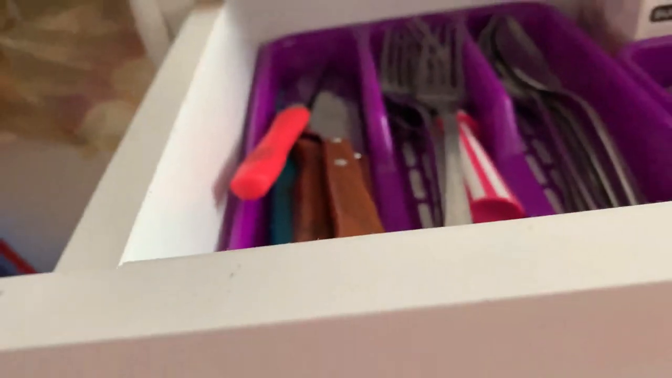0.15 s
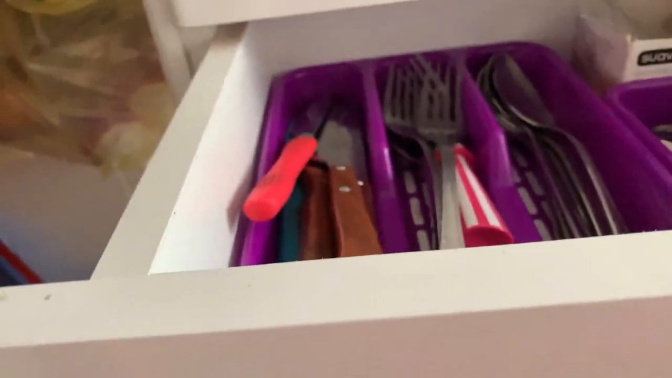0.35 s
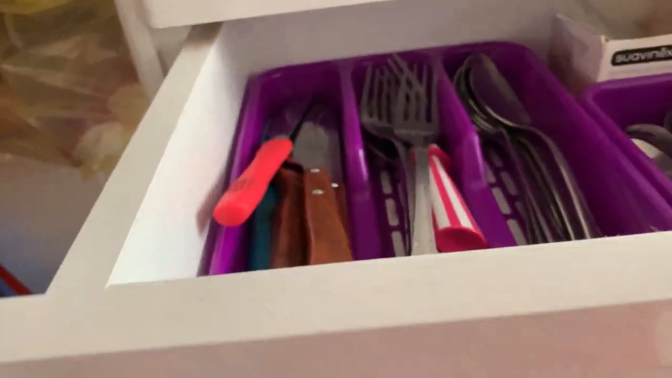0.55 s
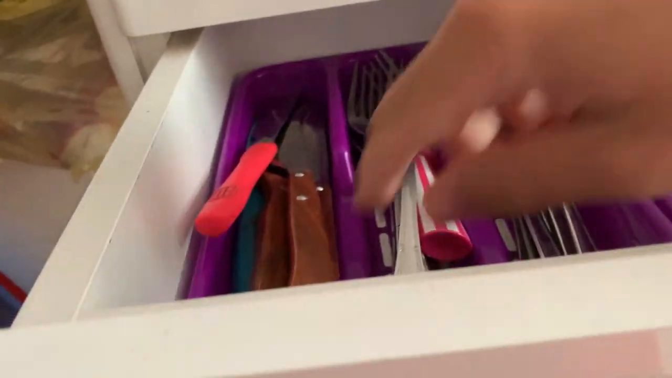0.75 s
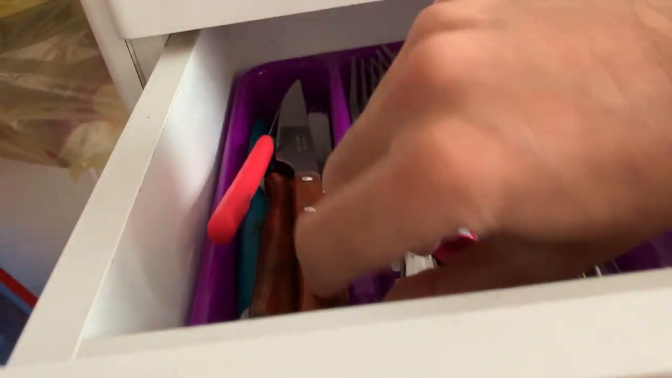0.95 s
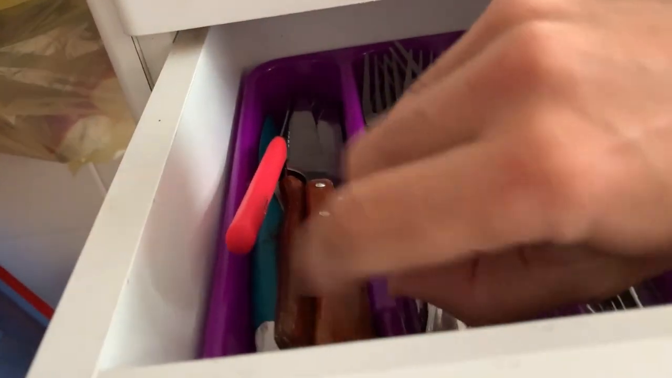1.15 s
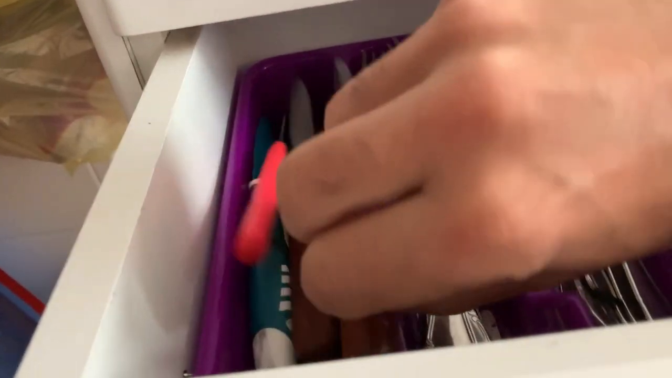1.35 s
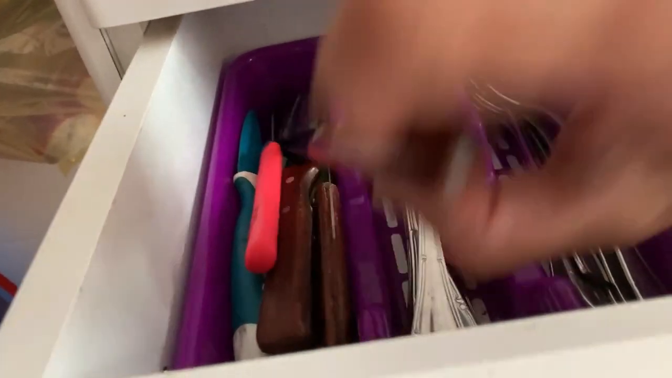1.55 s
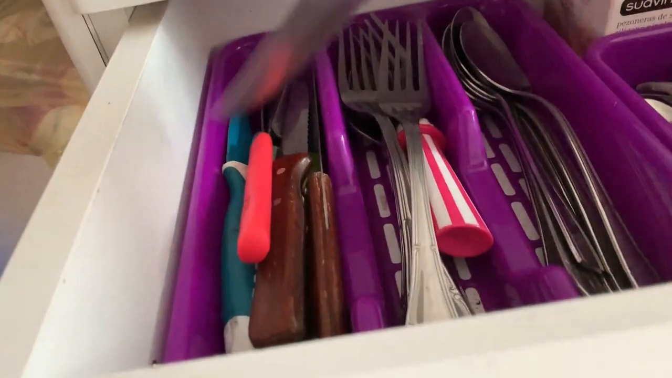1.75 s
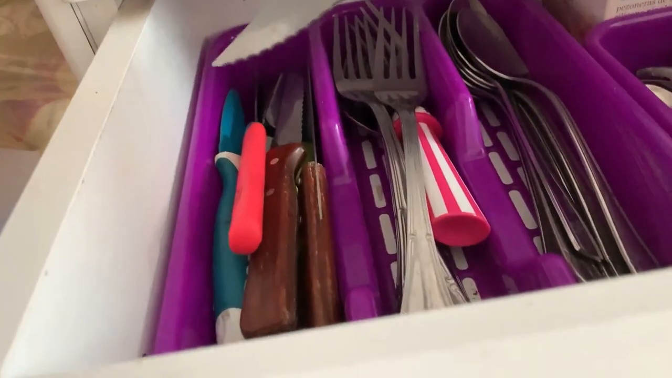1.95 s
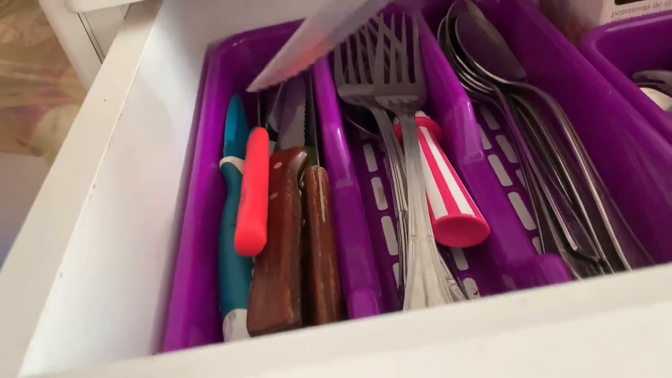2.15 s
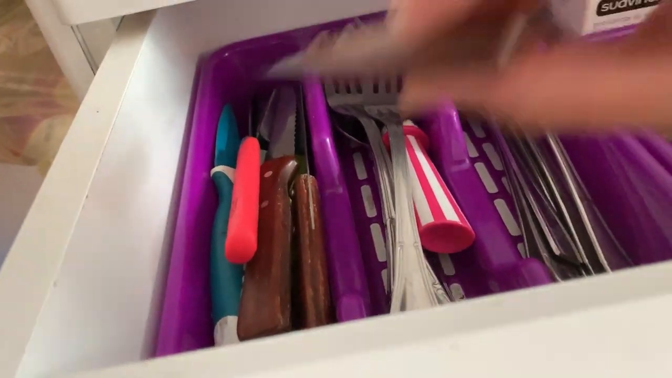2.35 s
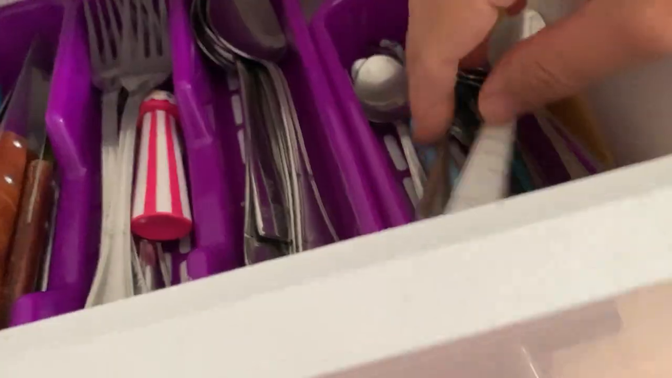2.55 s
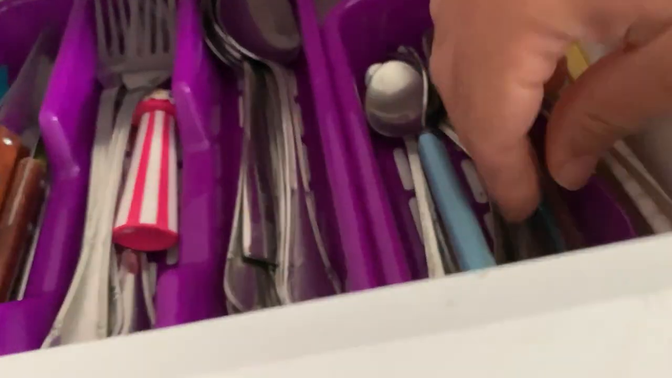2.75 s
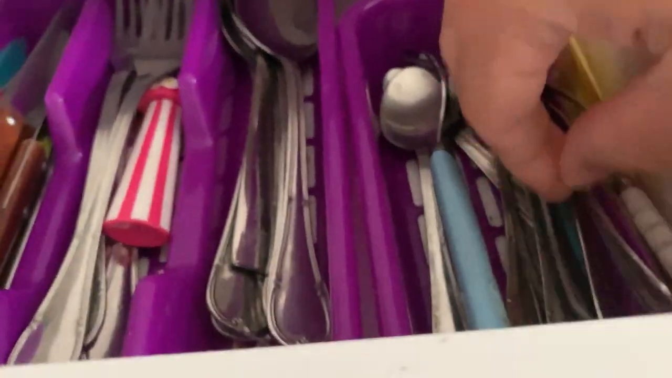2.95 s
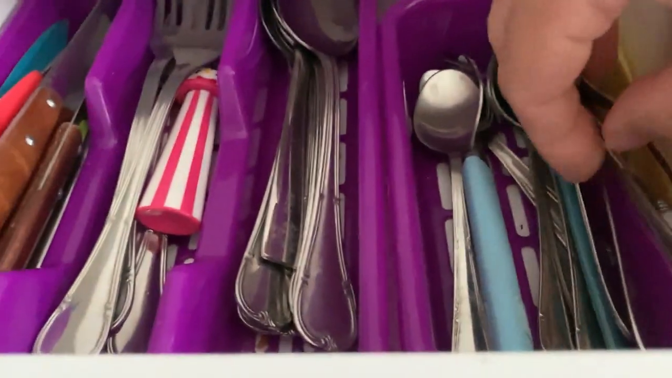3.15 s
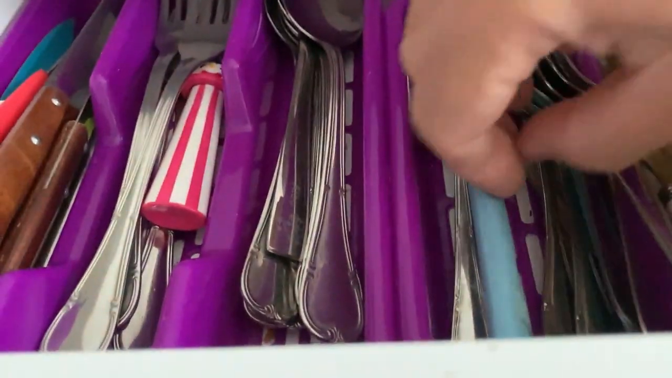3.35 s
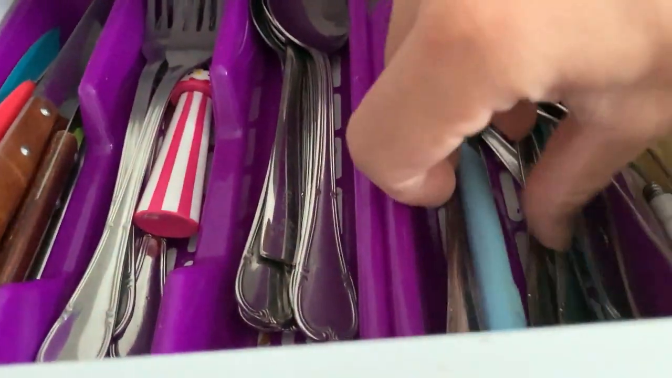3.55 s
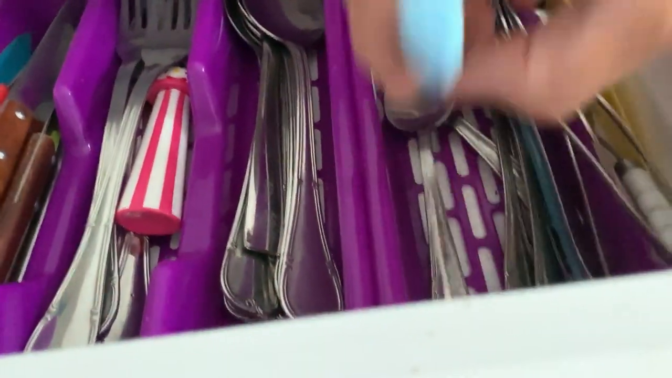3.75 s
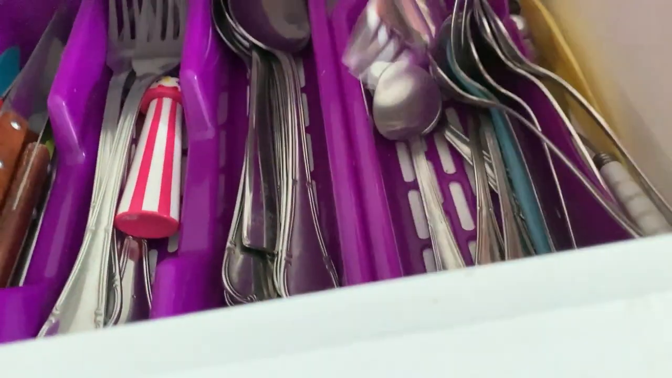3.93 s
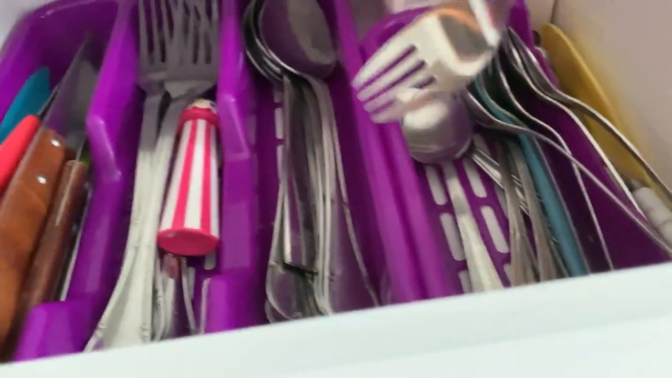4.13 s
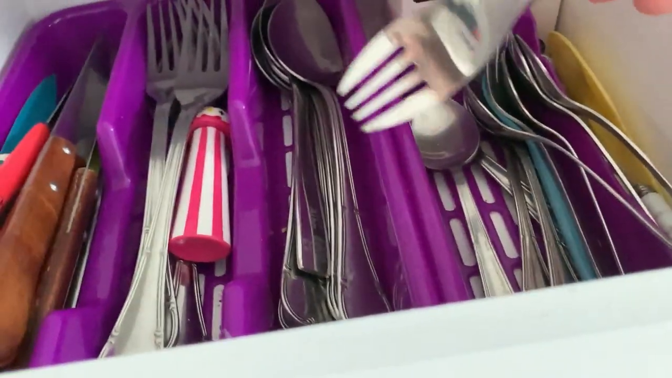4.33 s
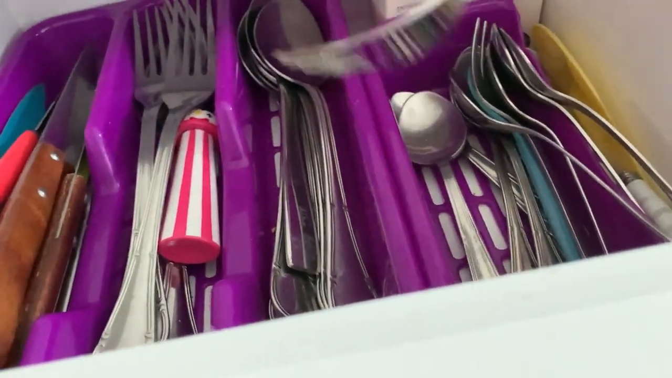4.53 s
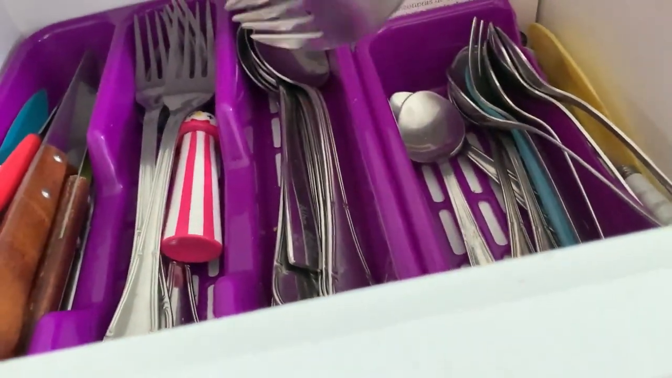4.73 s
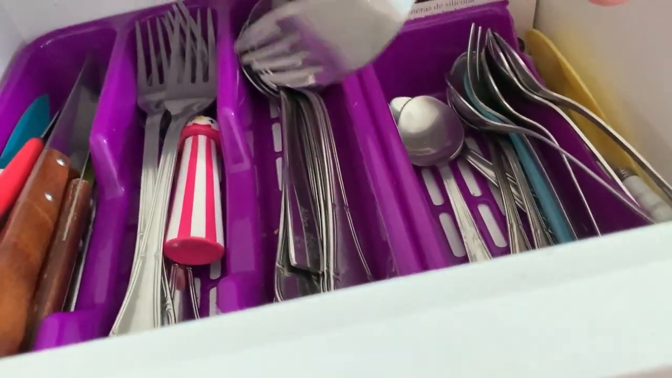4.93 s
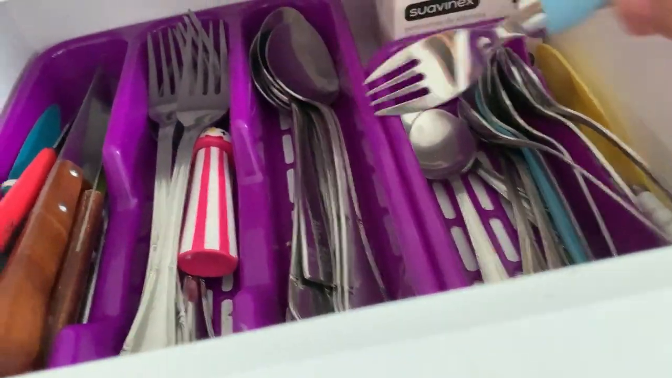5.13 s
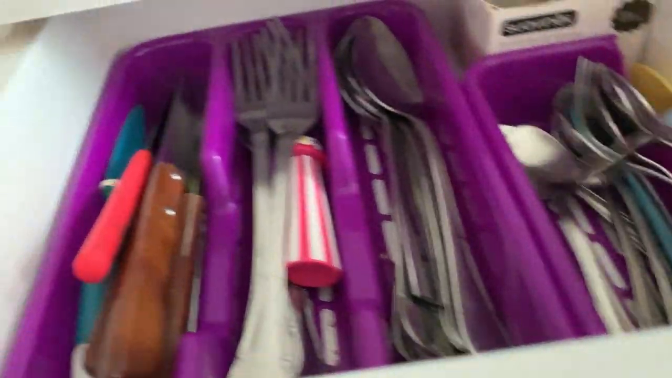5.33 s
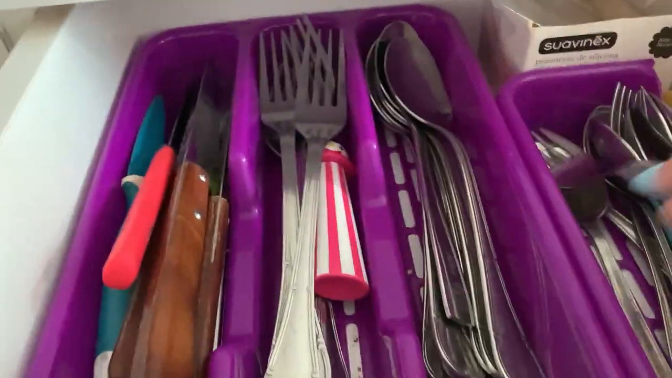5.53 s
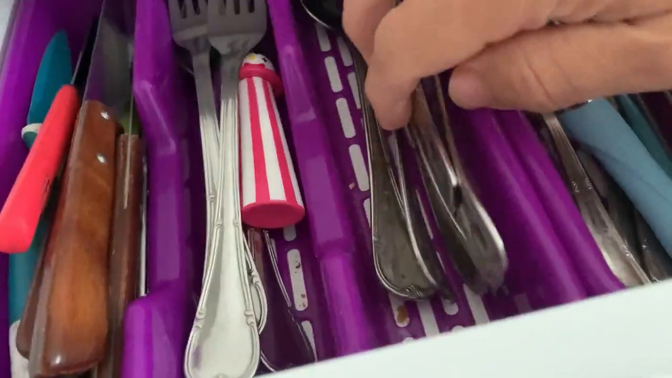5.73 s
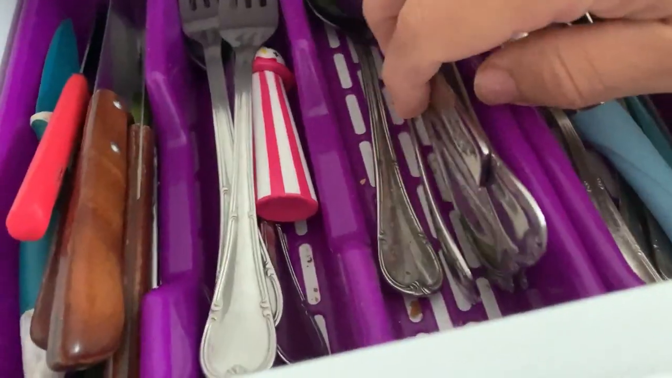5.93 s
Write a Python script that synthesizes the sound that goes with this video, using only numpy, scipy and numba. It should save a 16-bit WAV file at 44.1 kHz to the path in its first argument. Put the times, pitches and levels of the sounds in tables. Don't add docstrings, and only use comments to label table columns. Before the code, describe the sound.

A hand rummages through metal cutlery in a plastic drawer tray, with bright clinks, dull clacks, a ringing knife and fork, and quiet gaps.

```python
import sys
import numpy as np
from scipy import signal
from scipy.fft import rfft, irfft
from scipy.io import wavfile
from numba import njit

SR = 44100
rng = np.random.default_rng(int(sys.argv[2]) if len(sys.argv) > 2 else 0)


def unload_wav(signal):
    wavfile.write(
        sys.argv[1],
        SR,
        np.round(np.clip(np.atleast_2d(signal).T, -1, 1) * 32767).astype(np.int16),
    )


def boost_factor(decibels):
    exponent = np.asarray(decibels, float) / 20
    return 10 ** exponent


N = 263718

# frequency in Hz, level in dB per Hz.
STEEL = [(1290, -27), (2200, -14), (3090, -35.5), (3350, -8), (5100, -9), (5540, -7), (8720, 0),
         (11000, -3.5), (15800, -12)]
# frequency in Hz, level in dB per Hz.
TRAY = [(320, -37.5), (550, -12.5), (655, -11.5), (854, 6), (975, -1), (1770, 2.5), (2240, -0.5),
        (4000, -3), (6300, -16.5), (8800, -58)]
# frequency in Hz, level in dB, t60 in seconds.
BOX = [(260, -21.5, 0.013), (340, 8.5, 0.086), (396.4, 17.5, 0.061), (414, 16, 0.062), (513, -1.5, 0.042),
       (695.5, 2.5, 0.04)]
# frequency in Hz, level in dB, t60 in seconds.
FORK = [(3440, -29, 0.73), (4630, -17, .15), (5467, -0.5, 0.27), (5400, 3, 0.16), (7660, -20, 0.1176),
        (9846, 16.5, 0.085), (10300, -9, 0.145), (11300, 6, 0.097), (13500, 3, 0.2), (15200, -29, 0.18)]
# frequency in Hz, level in dB, t60 in seconds.
KNIFE = [(3070, 0, .15), (4400, -11.5, 0.31), (7270, -16, .13), (8250, 13.5, 0.083), (11160, -6, 0.22),
         (13000, -15.5, .15)]

# start in seconds, steel peak in dB, tray level in dB relative to the steel, chatter t60 in seconds.
DRAWER_STOPS = [(.0044, -36.5, 19, 0.15), (.0383, -9.5, -4.5, .07), (.0907, -16, -3.5, 0.077),
                (.1241, -20, -4.5, 0.16), (.1466, -16.5, -29.5, 0.06), (.169, -35.5, -8, 0.14),
                (.2009, -35.5, -5, 0.089), (.421, -55, -20, .015)]
GRAB_KNIVES = [(.9243, 1, -16, .05), (.9672, -6.5, -4, .055), (.977, -8, -7.5, .15),
               (.9931, 2, -11.5, .077), (1.0114, 1.5, -9.5, .18), (1.057, -3, -12.5, .042),
               (1.0627, -11, -8, .1), (1.0865, -14, -25.5, .09), (1.0894, 4.5, -16, .045),
               (1.1184, -2, -21.5, .083), (1.1378, 6.5, -18, .056), (1.1516, -17.5, -12, .087),
               (1.1702, -10.5, -19.5, .07), (1.1846, -8, -10.5, .1), (1.2201, -11, -20.5, .03),
               (1.2501, -17.5, -32.5, .025)]
PULL_KNIFE = [(1.3369, 3, -16, .06), (1.3663, -1.5, -10, 0.057), (1.392, 0.5, -6.5, .058),
              (1.4087, 9, -17, 0.19), (1.4594, -5.5, -8.5, 0.061), (1.4885, -3.5, -12, 0.18),
              (1.5047, -4, -11, 0.069), (1.5494, -6, -19.5, 0.048), (1.5778, -8.5, -21.5, .088),
              (1.5865, -1, -22, 0.072)]
SCRAPE_KNIFE = [(1.6397, -5.5, -22, 0.097), (1.6711, -5.5, -12, 0.031), (1.6841, -0.5, -28.5, 0.047),
                (1.7145, -9, -15.5, 0.038), (1.7264, -8.5, -8.5, 0.085)]
LIFT_KNIFE = [(1.7536, -4, -27, 0.13), (1.7644, 4.5, -22.5, 0.032)]
DROP_KNIFE = [(2.5042, 5.5, -10.5, 0.035), (2.5112, -12.5, 1.4, 0.16), (2.5306, -4.5, -13.5, .1),
              (2.5775, -6, -7, .02)]
SORT_SPOONS = [(2.612, -24.5, -2.5, 0.14), (2.6464, -21.5, -4, 0.03), (2.6638, -6, -16.5, 0.12),
               (2.6963, 4.5, -10.5, 0.089), (2.7096, 5.5, -20.5, 0.48), (2.7387, 2.5, -6, 0.18),
               (2.7505, -13, -11, 0.079), (2.8028, -9.5, -11.5, 0.33), (2.8185, -1.5, -32.5, .15),
               (2.8352, -7, -21, 0.057), (2.8714, -9.5, -20.5, 0.14), (2.9218, 3.4, -23.5, .11),
               (2.9407, -11, -24.5, 0.12), (2.9721, -5, -29.5, 0.043)]
SORT_FORKS = [(3.047, -3, -18, .06), (3.1091, -15.5, -11.5, 0.023), (3.1188, -3.5, -8, 0.038),
              (3.1384, -8.5, -18, 0.053), (3.1438, 3.5, -25, 0.1), (3.2394, -28, -2, 0.3),
              (3.2834, -18, -19, .03), (3.3104, -4.5, -31.5, 0.09), (3.3304, -10.5, -2.5, 0.11),
              (3.3413, 4, -29, 0.096), (3.3784, -4.5, -9, 0.023), (3.3979, -2, -19, 0.13),
              (3.4221, -11, -28.5, 0.064)]
GRAB_FORK = [(3.5299, -7, -20.5, 0.072), (3.5533, -3, -16.5, 0.072), (3.5803, 0, -16.5, 0.14),
             (3.6052, 7, -16, 0.058), (3.677, -20, -35, 0.048), (3.7209, -7, -8, 0.094),
             (3.7828, -3.5, -37, 0.083), (3.8147, -11.5, -12.5, 0.06), (3.8442, -16.5, -15.5, 0.39)]
LIFT_FORK = [(3.916, 1, -21, 0.088), (3.9434, -2, -15, 0.34), (3.9664, 3, -34, 0.042),
             (3.9923, 4.5, -34, 0.092), (4.0129, -8, -30, 0.12), (4.0322, 8.5, -64, 0.12),
             (4.0479, 1, -21.5, 0.069), (4.0565, -12, -37, 0.016), (4.0758, -21.5, -21, 0.073)]
DROP_FORK = [(5.233, -6, -4, 0.046), (5.3946, -24, -16, 0.42)]
STIR_SPOONS = [(5.442, 10, -41, 0.072), (5.4691, -4.5, -13.5, 0.15), (5.4869, 10, -64, 0.068),
               (5.5184, -1.5, -53, 0.094), (5.5558, -5.5, -17, 0.14), (5.5947, 0, -49, 0.098),
               (5.6168, 5, -25.5, .14), (5.6393, -13, -2.5, 0.1), (5.6873, -2, -23, 0.21),
               (5.7179, -1, -19, 0.54), (5.7443, 1, -20, 0.15), (5.7614, -1, -35, 0.11),
               (5.776, -1.5, -43.5, 0.13), (5.878, -14.5, -16.5, 0.11), (5.9459, -26, -13, 0.16)]
# its knocks, edge hardness in dB, loose steel and loose tray in dB
# relative to the knocks, settling t60 in seconds, notes of the piece left ringing.
MOVES = [(DRAWER_STOPS, -24.5, -40, -20.5, 0.25, ()), (GRAB_KNIVES, 8.5, -50.5, -33, .35, ()),
         (PULL_KNIFE, 8, -43.5, -38.5, 0.7, ()), (SCRAPE_KNIFE, 6, -49, -37, 0.56, ()),
         (LIFT_KNIFE, -3, -42, -57, .4, KNIFE), (DROP_KNIFE, -4.5, -51, -46.5, .4, ()),
         (SORT_SPOONS, -23.5, -42.5, -43.5, 0.98, ()), (SORT_FORKS, -17, -42, -35.5, .4, ()),
         (GRAB_FORK, -3, -54, -49.5, 1, ()), (LIFT_FORK, 9.6, -35, -40, 0.23, FORK),
         (DROP_FORK, -29, -37, -31, 0.47, ()), (STIR_SPOONS, 3.9, -45.5, -45.5, 0.7, ())]

# start in seconds, peak in dB, frequency in Hz.
RINGS = [(0.1684, -39, 11000), (1.0134, -9, 9180), (1.0894, -1, 15200), (1.1184, -3.5, 11060),
         (1.409, -8, 6540), (1.5494, -13, 11850), (2.7395, -10, 8120), (3.1435, -10.5, 12300),
         (3.3413, -4, 9030), (3.581, -11.5, 11300), (3.6052, -7.5, 7790), (5.6164, -5.5, 8330),
         (5.7443, 0, 14030)]
# start in seconds, peak in dB, chatter t60 in seconds.
THUMPS = [(0.046, -21.5, 0.12), (.497, -39, .022), (0.934, -15.5, 0.064), (0.989, -11, 0.018),
          (1.019, -18.5, 0.16), (1.084, -15, 0.01), (1.124, -17.5, 0.019), (1.345, -13.5, 0.023),
          (1.392, -9, 0.028), (1.42, -9.5, 0.038), (1.462, -17.5, 0.033), (1.493, -19.5, 0.019),
          (1.542, -19.5, 0.043), (2.513, -18, 0.035), (2.667, -18.5, 0.038), (2.714, -12, 0.017),
          (2.73, -13, 0.088), (2.749, -14, 0.013), (2.925, -21, 0.039), (3.14, -21.5, 0.038),
          (3.341, -20, 0.025), (3.56, -23, 0.11), (3.602, -16.5, 0.028), (3.618, -12, 0.02),
          (3.724, -16, 0.046), (3.916, -23, 0.067), (5.241, -10.5, 0.014), (5.636, -16, 0.02),
          (5.775, -22, 0.02), (5.879, -28, 0.16)]
RATTLE_SPELLS = [(0, .3), (.74, .915), (.92, 2.0), (2.4, 4.2), (5.12, 5.98)]
# start in seconds, end in seconds, attack in seconds, steel level in dB, tray level in dB.
REACHES = [(0.724, 0.926, 0.065, -50, -53), (2.385, 2.507, 0.17, -46, -47.5),
           (5.097, 5.24, 0.13, -69, -61.5)]
# start in seconds, peak in dB, frequency in Hz, t60 in seconds.
BUMPS = [(0.009, -52, 56.5, 0.074), (0.052, -31, 70.0, 0.28), (0.129, -27, 88.8, 0.4),
         (1.021, -24.5, 180, 0.099), (1.387, -24.5, 218, 0.043), (3.619, -31, 175, 0.063),
         (3.942, -34, 64.6, 0.43)]
# start in seconds, length in seconds, centre in Hz, width in Hz, level in dB.
BRUSHES = [(0.214, 1, 930, 259, -64), (2.13, 0.9, 4176, 300, -78), (0, 0.25, 189, 60.6, -39),
           (4.519, 0.26, 2335, 70, -85), (4.656, .2, 1670, 159.6, -80), (4.661, 0.25, 893, 150, -82)]
# frequency in Hz, level in dB.
PORTS = [(60, -20.5), (110, 0), (200, -42), (380, -4), (700, 6), (1290, 5.5), (2380, 5.5), (4400, 8),
         (8120, 2), (15000, 3.5)]
# time in seconds, level in dB.
RUMBLE_LEVEL = [(0.0, -39), (0.51, -47.5), (3.81, -54), (3.98, -53), (4.13, -57), (5.46, -57), (5.98, -61)]
# time in seconds, level in dB.
AIR_LEVEL = [(0, -25.5), (.3, -57.5), (.75, -60.5), (2.0, -65), (2.4, -66.5), (4.3, -73), (4.8, -70),
             (5.15, -73), (5.98, -62)]
# frequency in Hz, level in dB per Hz.
RUMBLE = [(15, -56), (25, -19), (54, -2), (70, -4.5), (102, -6.5), (116, -2.5), (129, -35), (200, -23.5),
          (260, -62), (440, -120)]
# frequency in Hz, level in dB per Hz.
AIR = [(120, -3), (200, 6), (450, -2.5), (700, -13), (950, -8), (1300, -14.5), (2300, -22.5), (5000, -28.5),
       (16000, -33)]

SCENE_CHANGE_S = 2.581
LEAD_S = .006


def shape(table, hz):
    f, db = np.transpose(table)
    return boost_factor(np.interp(np.log(np.maximum(hz, 1)), np.log(f), db))


def colour(x, table):
    return irfft(rfft(x) * shape(table, np.fft.rfftfreq(N, 1 / SR)), N)


def unit(x):
    return x / np.sqrt(np.mean(x ** 2))


def coloured_noise(table):
    return unit(colour(rng.standard_normal(N), table))


def level_curve(table):
    s, db = np.transpose(table)
    return np.interp(np.arange(N) / SR, s, db)


@njit
def ring(push, hz, gain, t60, size):
    out = np.zeros(size)
    for m in range(len(hz)):
        turn = np.exp(2j * np.pi * hz[m] / SR - np.log(1000) / (t60[m] * SR))
        z = 0j
        for i in range(min(size, len(push) + int(t60[m] * SR))):
            z = z * turn + (push[i] if i < len(push) else 0.)
            out[i] += gain[m] * z.imag
    return out


def add(out, s, sound, db):
    start = max(int((s - LEAD_S) * SR), 0)
    cut = int(SCENE_CHANGE_S * SR)
    end = cut if start < cut else N
    sound = (sound * boost_factor(db) / np.abs(sound).max())[:end - start]
    out[start:start + len(sound)] += sound


def cutlery():
    out = np.zeros((2, N))
    for knocks, edge_db, *_, free_notes in MOVES:
        for s, db, tray_db, t60 in knocks:
            push = knock(out, s, db, db + tray_db, t60, edge_db, count=56)
            if free_notes:
                sing(out[0], s, push, free_notes, db - 21.5)
    for s, db, hz in RINGS:
        sing(out[0], s, chatter(0.039), [(hz, 0, .05)], db - 8.5)
    for s, db, t60 in THUMPS:
        thump(out, s, db, t60)
    return out


def knock(out, s, steel_db, tray_db, t60, edge_db, count):
    push = chatter(t60)
    size = len(push) + int(.06 * SR)
    for view in out:
        hz, gain, life = random_modes(STEEL, 0.01, count)
        gain *= boost_factor(0.6 * (edge_db + 8.0) * np.log2(hz / 8000))
        gain /= np.sin(np.pi * hz / SR) ** 2
        add(view, s, np.diff(ring(push, hz, gain, life, size), 2), steel_db)
        hz, gain, life = random_modes(TRAY, 0.023, count // 2, order=2)
        add(view, s, ring(push, hz, gain, life, size), tray_db)
    return push


def chatter(t60, bounce_hz=3500, scatter_db=3.5, blow=2.78, rise_s=0.003, graze_db=-30):
    length_s = np.clip(t60, .004, .144) + LEAD_S
    t = np.arange(int(length_s * SR)) / SR - LEAD_S
    chance, strength, sign = rng.random((3, len(t)))
    push = (chance < bounce_hz / SR) * boost_factor(-scatter_db * np.log(strength)) * np.sign(sign - .5)
    push *= np.clip(t / rise_s, .3, 1)
    push *= boost_factor(graze_db * np.maximum(-t / LEAD_S, 0))
    push[int(LEAD_S * SR)] = blow
    return push * boost_factor(-60 * (np.maximum(t, 0) / t60) ** 1.104)


def random_modes(table, t60, count, order=1):
    jitter, level, life = rng.random((3, count))
    place = (np.arange(count) + jitter) / count
    low_hz, high_hz = table[0][0], table[-1][0]
    hz = low_hz + (high_hz - low_hz) * place ** order
    gain = shape(table, hz) * boost_factor(12.0 * level)
    gain *= place ** ((order - 1) / 2)
    return hz, gain, t60 * (0.39 + 1.02 * life) * (hz / hz.mean()) ** -.3


def sing(out, s, push, modes, db, spread=0.014):
    hz, gain_db, life = np.repeat(modes, 3, axis=0).T
    detuned = hz * (1 + spread * rng.standard_normal(len(hz)))
    add(out, s, ring(push, detuned, boost_factor(gain_db), life, SR // 2), db)


def thump(out, s, db, t60):
    push = chatter(t60)
    hz, gain_db, life = np.transpose(BOX)
    for view in out:
        detune, weight = rng.standard_normal((2, len(BOX)))
        spot_hz = hz * (1 + 0.06 * detune)
        spot_gain = boost_factor(gain_db + 3 * weight)
        add(view, s, ring(push, spot_hz, spot_gain, life, len(push) + SR // 10), db)


def rattle(per_s=120, scatter_db=2, slide_db=-2):
    steel_db, tray_db = stir()
    out = np.zeros((2, N))
    for start, end in RATTLE_SPELLS:
        for slot in np.arange(start, end - .009, 1 / per_s):
            s = slot + rng.random() / per_s
            db = scatter_db * rng.standard_normal()
            i = int(s * SR)
            knock(out, s, steel_db[i] + db + 7, tray_db[i] + db + 7.5, 0.017, -21.5, count=20)
            thump(out, s, tray_db[i] + db + 11, 0.013)
    for view in out:
        view += boost_factor(steel_db + slide_db) * coloured_noise(STEEL)
        view += boost_factor(tray_db + slide_db) * coloured_noise(TRAY)
    return out


def stir(rise_s=.04, settle_bend=0.81, reach_from_db=-38.5):
    t = np.arange(0, N / SR + .002, .001)
    power = 1e-12
    for knocks, _, steel_db, tray_db, t60, _ in MOVES:
        loose = boost_factor(np.array([[steel_db], [tray_db]]))
        for s, db, *_ in knocks:
            settling_db = -60 * (np.maximum(t - s, 0) / t60) ** settle_bend
            shake = np.clip((t - s) / rise_s, 0, 1) * boost_factor(db + settling_db)
            same_scene = (t < SCENE_CHANGE_S) | (s > SCENE_CHANGE_S)
            power = power + (shake * same_scene * loose) ** 2
    for start, end, attack, steel_db, tray_db in REACHES:
        slide = boost_factor(reach_from_db * np.clip(1 - (t - start) / attack, 0, 1)) * (t > start) * (t < end)
        power = power + (slide * boost_factor(np.array([[steel_db], [tray_db]]))) ** 2
    return [np.interp(np.arange(N) / SR, t, 10 * np.log10(p)) for p in power]


def handling():
    out, t = np.zeros(N), np.arange(N) / SR
    for s, db, hz, t60 in BUMPS:
        press = np.hanning(int(.4 * SR / hz))
        modes_hz = np.array([hz, 1.3 * hz])
        add(out, s, ring(press, modes_hz, np.array([1, .4]), np.array([t60, t60]), SR // 2), db)
    for s, length, hz, width, db in BRUSHES:
        band = [(hz - 2 * width, -40), (hz - width / 2, 0), (hz + width / 2, 0), (hz + 2 * width, -40)]
        stroke = np.sin(np.pi * np.clip((t - s) / length, 0, 1))
        out += boost_factor(db) * stroke * coloured_noise(band)
    return out


def room(x, level_db=-23, t60_s=1, fade_s=.27, early_s=0.0027):
    t = np.arange(int(.6 * SR)) / SR
    tail = rng.standard_normal((2, len(t))) * boost_factor(-60 * t / t60_s) * (t > early_s)
    tail *= boost_factor(-60 * (t / fade_s) ** 5)
    tail *= boost_factor(level_db) / np.sqrt((tail ** 2).sum(1, keepdims=True))
    late = np.arange(N) >= SCENE_CHANGE_S * SR
    out = np.zeros((2, N))
    for part in (late, ~late):
        out += part * signal.fftconvolve((x * part)[None], tail, axes=1)[:, :N]
    return out


def kitchen():
    t = np.arange(N) / SR
    rumble_db, air_db = level_curve(RUMBLE_LEVEL), level_curve(AIR_LEVEL)
    hum = 0.39 * np.sin(2 * np.pi * 99 * t) + 0.21 * np.sin(2 * np.pi * 50 * t)
    mid = boost_factor(rumble_db - 3.0) * (coloured_noise(RUMBLE) + hum) + boost_factor(air_db - 2.5) * coloured_noise(AIR)
    side = boost_factor(rumble_db - 15) * coloured_noise(RUMBLE) + boost_factor(air_db - 6.0) * coloured_noise(AIR)
    return np.array([mid + side, mid - side])


def scene():
    no_bass = signal.butter(4, 230, "high", fs=SR, output="sos")
    mid, other = signal.sosfilt(no_bass, cutlery() + rattle())
    side = colour(0.52 * other + 0.094 * np.roll(mid, 13) - 0.37 * mid, PORTS)
    return np.array([mid + side, mid - side]) + room(mid) + handling() + kitchen()


def band_limit(x):
    return signal.sosfilt(signal.butter(12, 16810, fs=SR, output="sos"), x)


def record(dry):
    soft = np.tanh(0.76 * dry) / 0.61
    top_cut = signal.ellip(10, .2, 60, 15800, fs=SR, output="sos")
    return band_limit(signal.sosfilt(top_cut, soft))


dry = scene()
out = record(dry)
unload_wav(out)
```